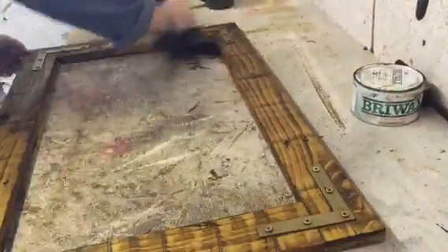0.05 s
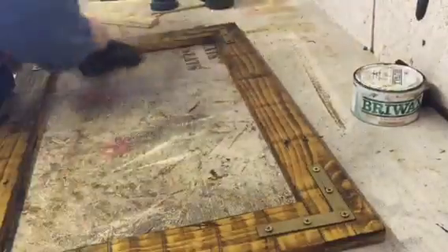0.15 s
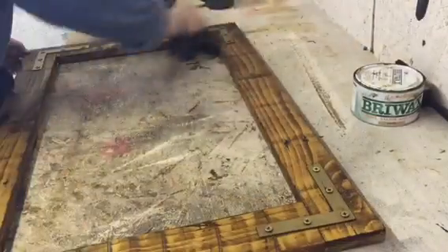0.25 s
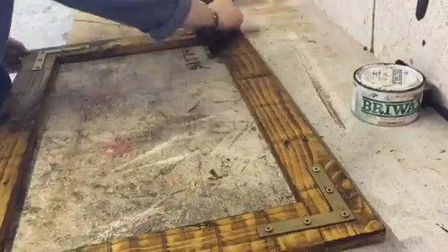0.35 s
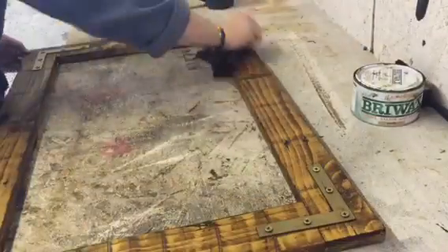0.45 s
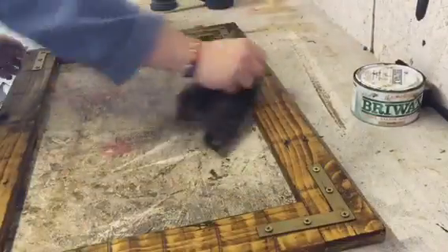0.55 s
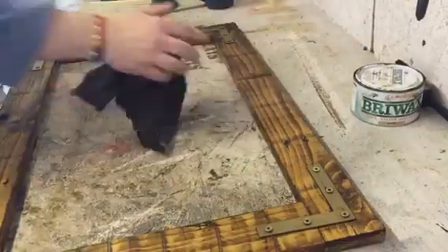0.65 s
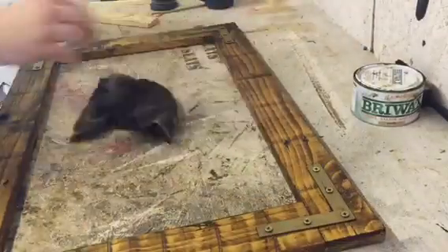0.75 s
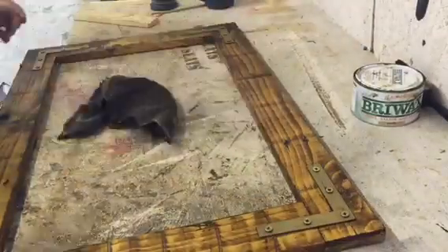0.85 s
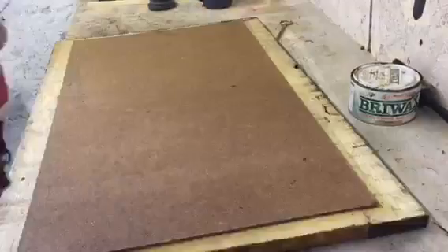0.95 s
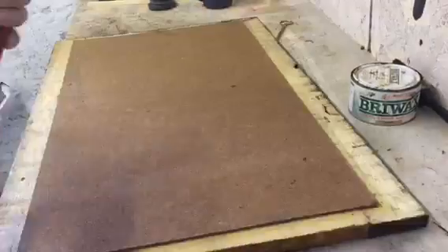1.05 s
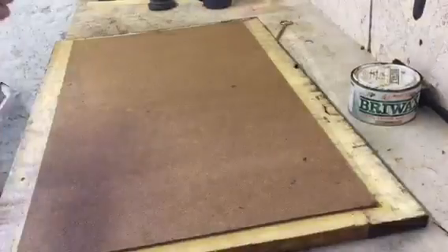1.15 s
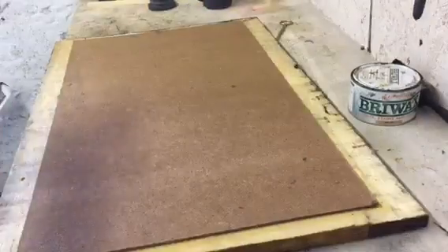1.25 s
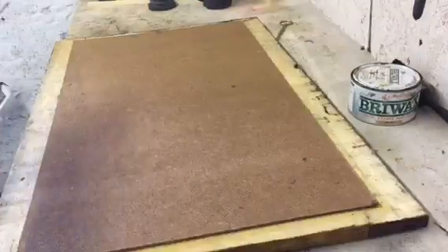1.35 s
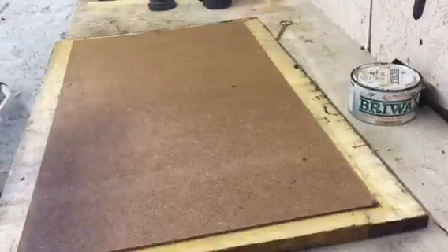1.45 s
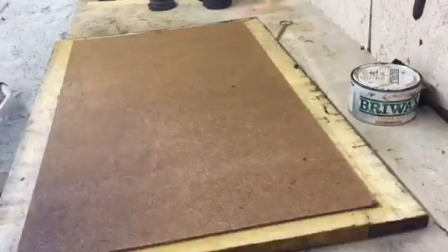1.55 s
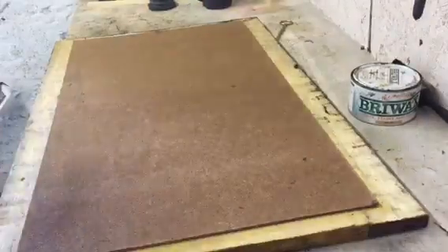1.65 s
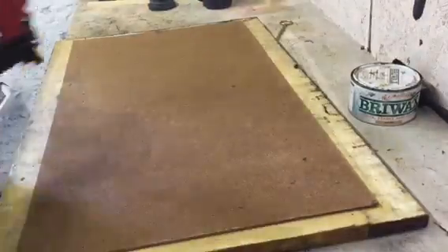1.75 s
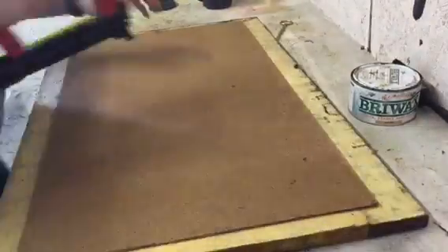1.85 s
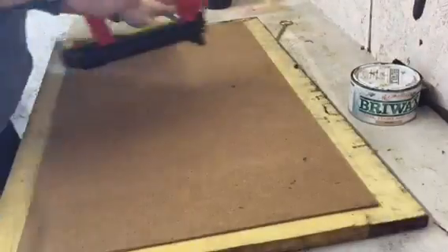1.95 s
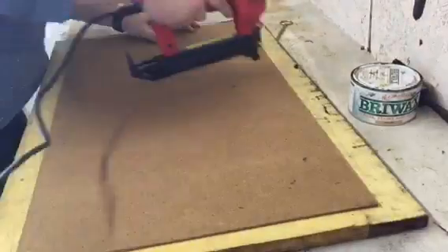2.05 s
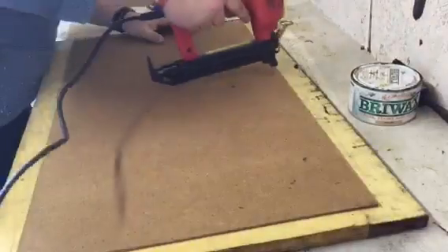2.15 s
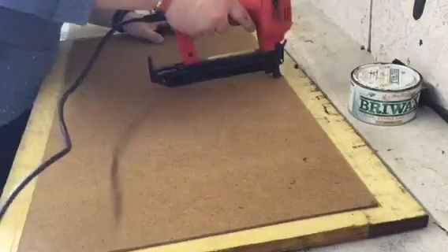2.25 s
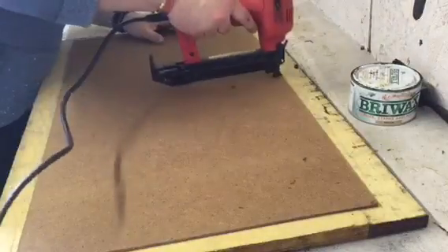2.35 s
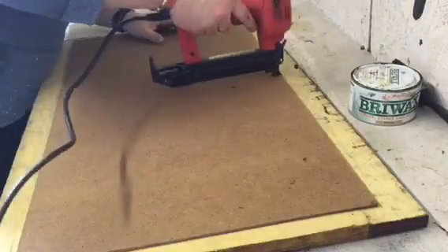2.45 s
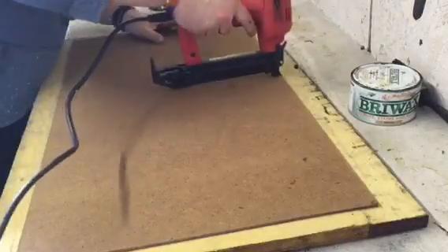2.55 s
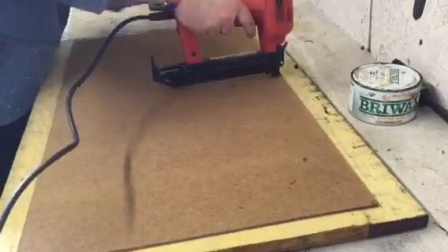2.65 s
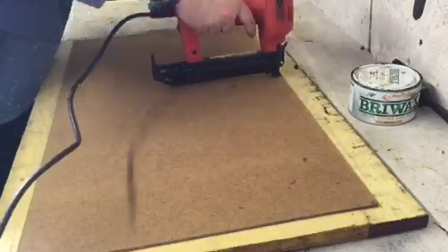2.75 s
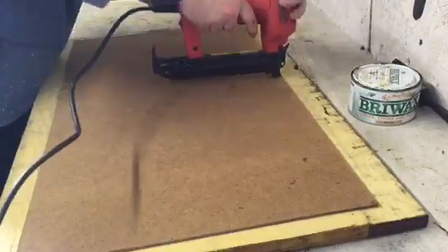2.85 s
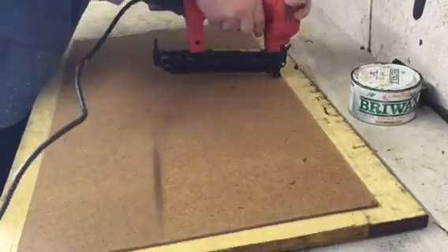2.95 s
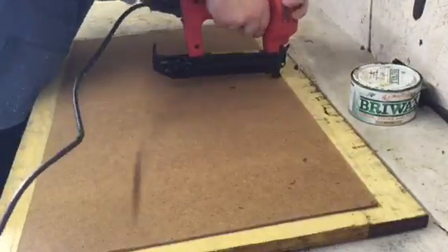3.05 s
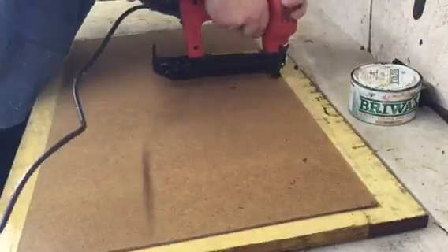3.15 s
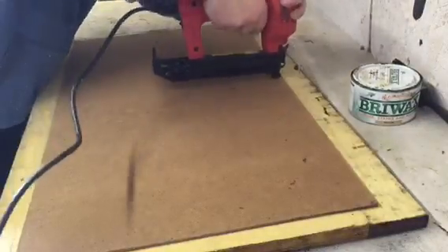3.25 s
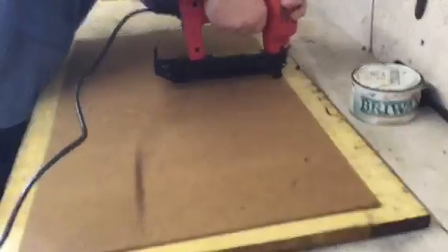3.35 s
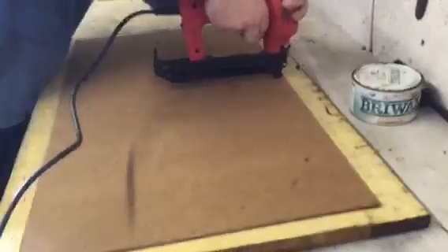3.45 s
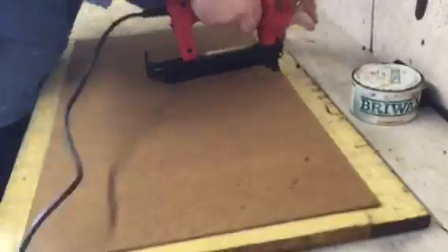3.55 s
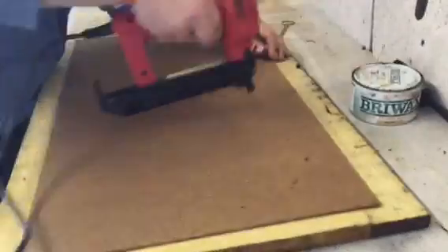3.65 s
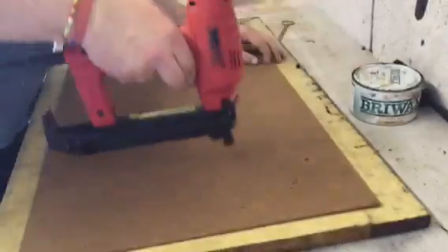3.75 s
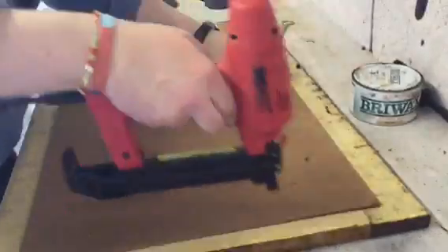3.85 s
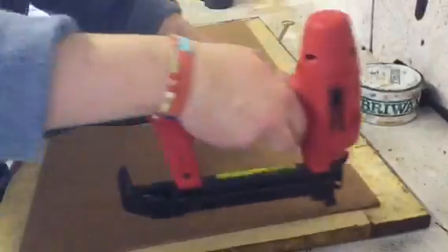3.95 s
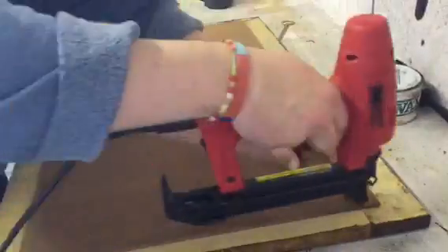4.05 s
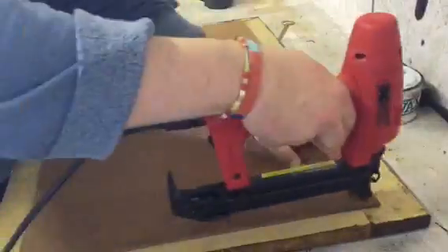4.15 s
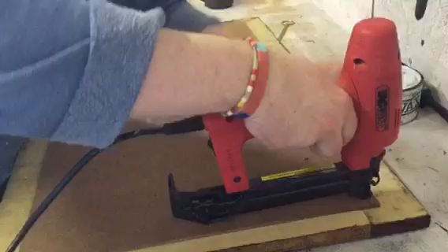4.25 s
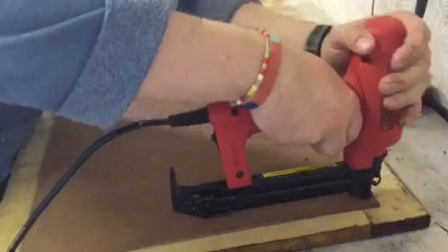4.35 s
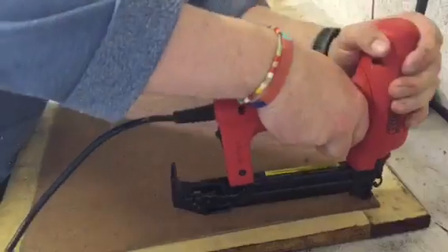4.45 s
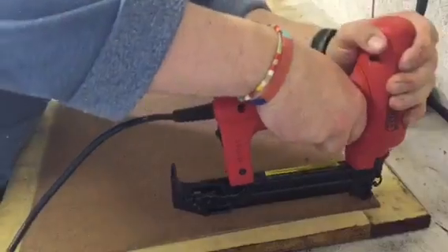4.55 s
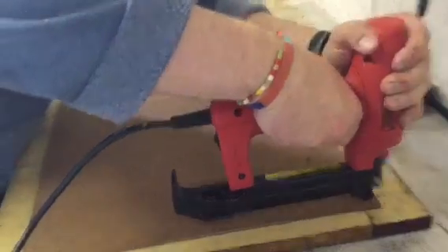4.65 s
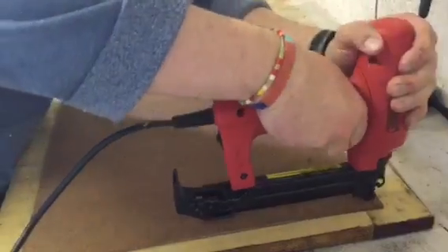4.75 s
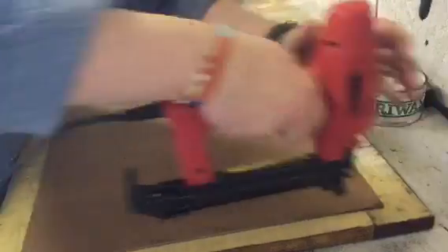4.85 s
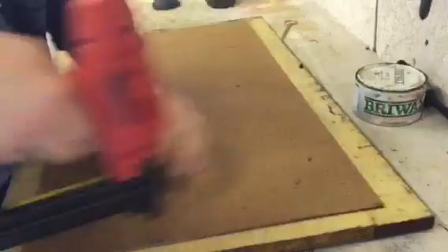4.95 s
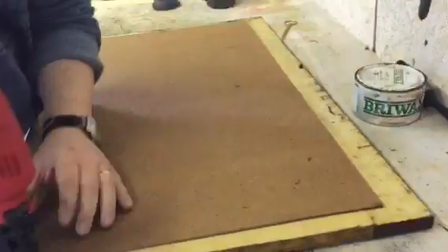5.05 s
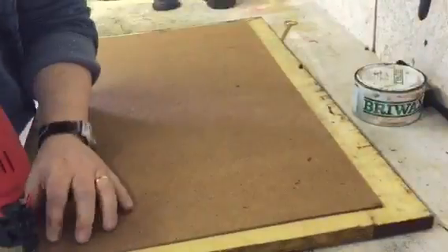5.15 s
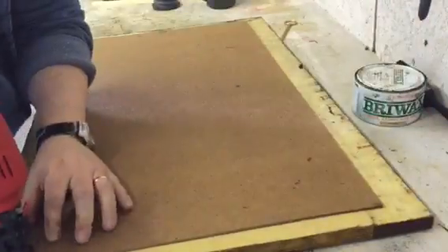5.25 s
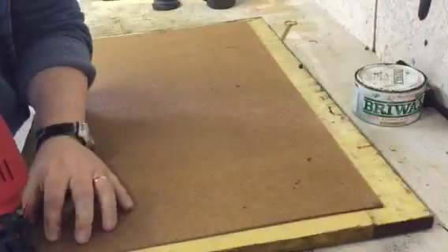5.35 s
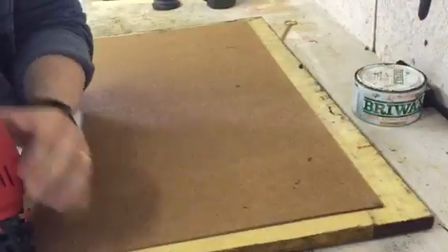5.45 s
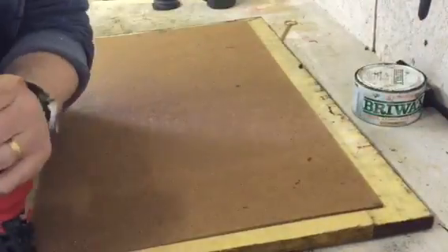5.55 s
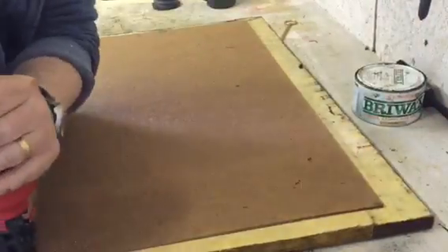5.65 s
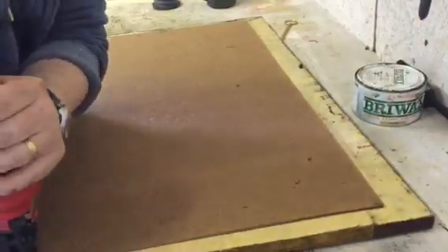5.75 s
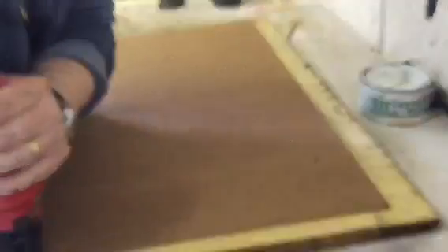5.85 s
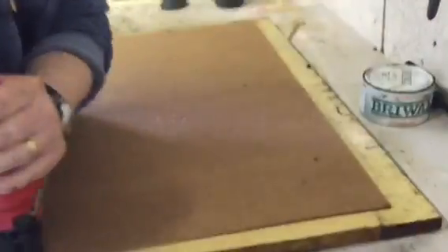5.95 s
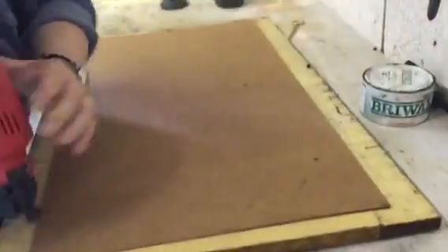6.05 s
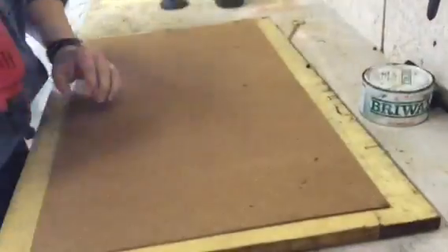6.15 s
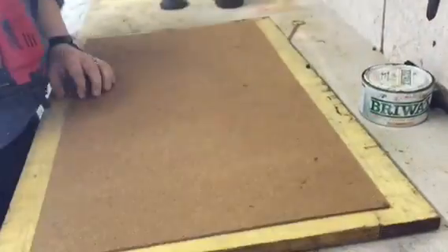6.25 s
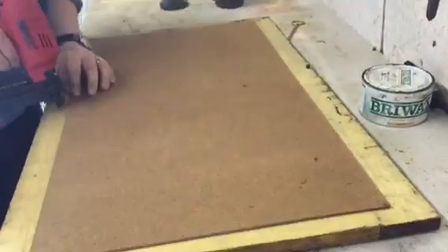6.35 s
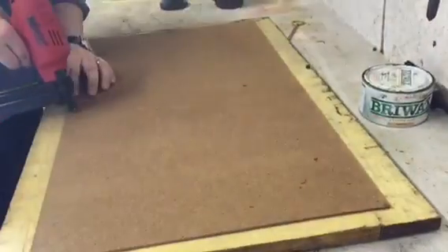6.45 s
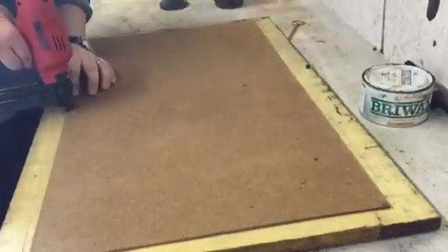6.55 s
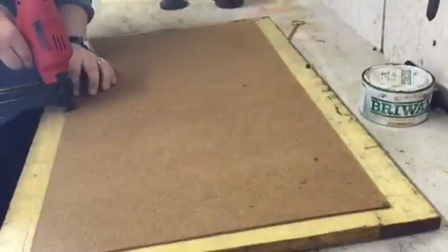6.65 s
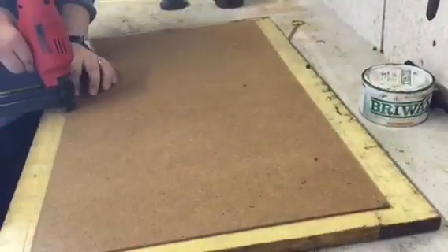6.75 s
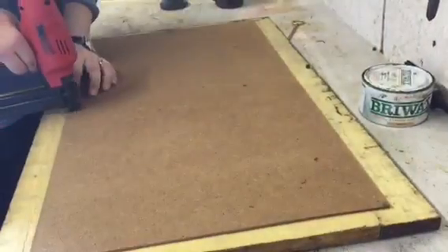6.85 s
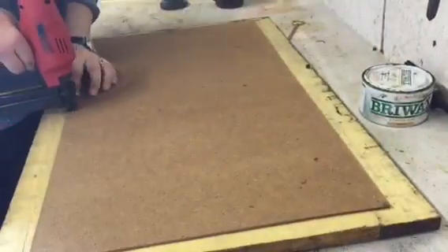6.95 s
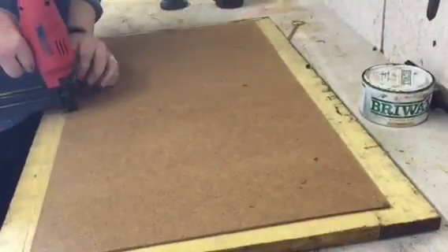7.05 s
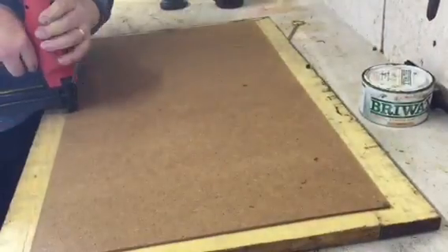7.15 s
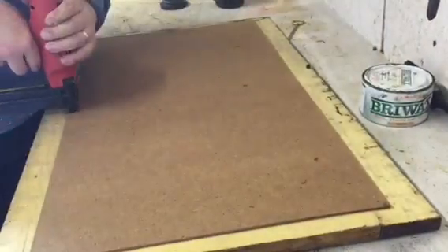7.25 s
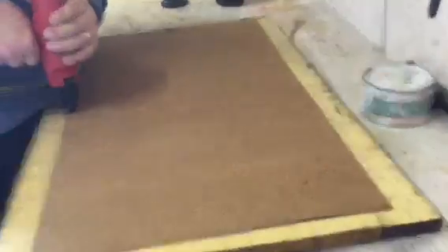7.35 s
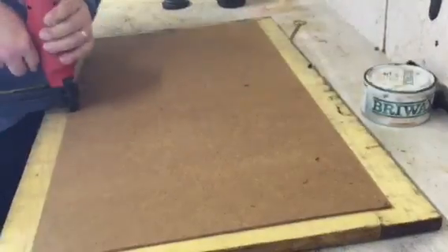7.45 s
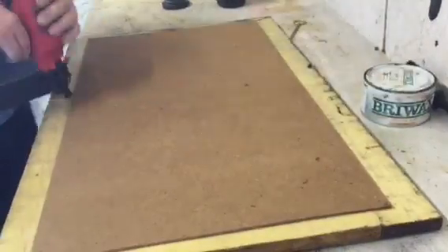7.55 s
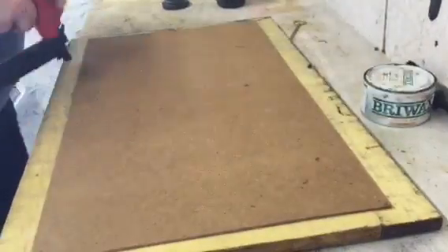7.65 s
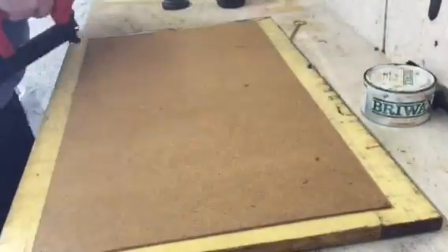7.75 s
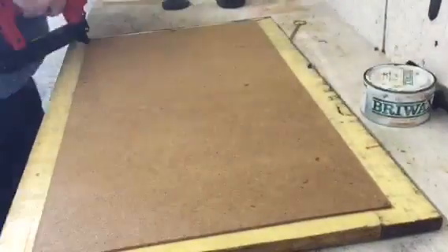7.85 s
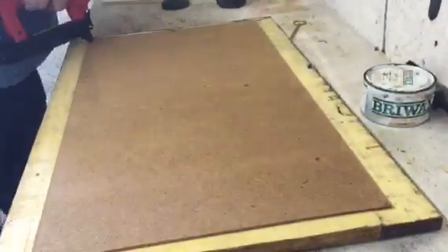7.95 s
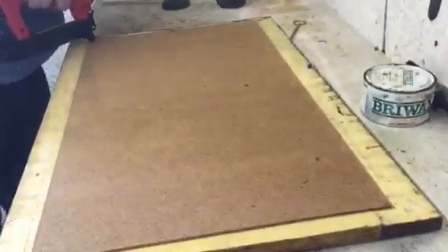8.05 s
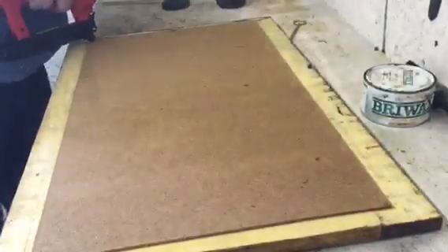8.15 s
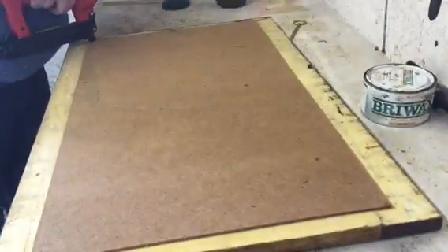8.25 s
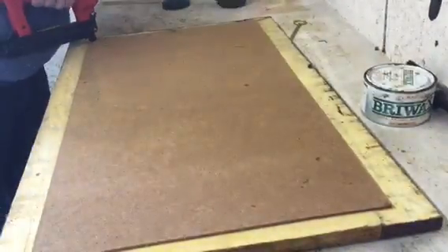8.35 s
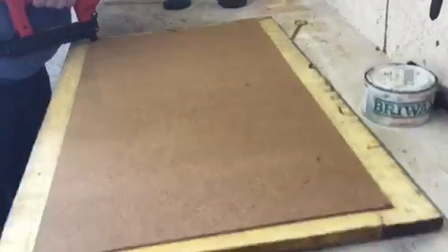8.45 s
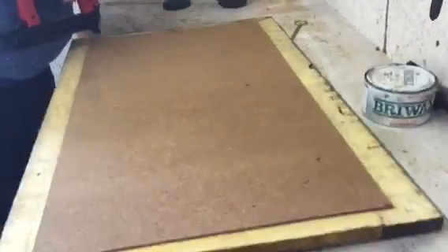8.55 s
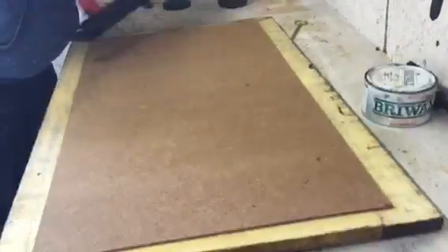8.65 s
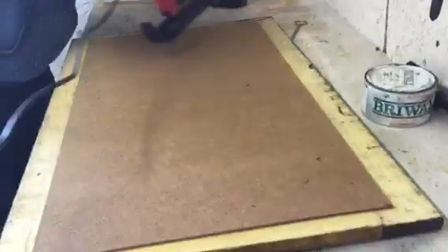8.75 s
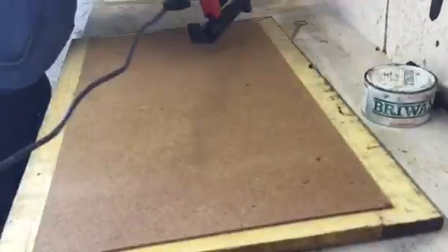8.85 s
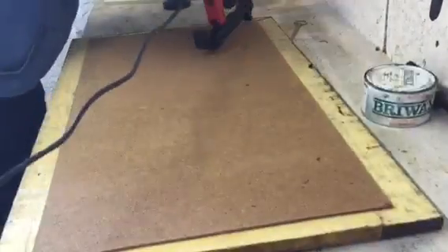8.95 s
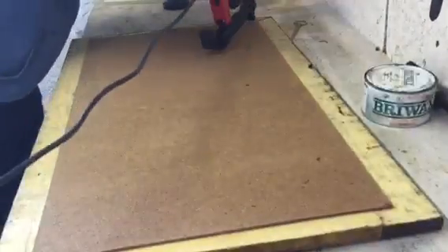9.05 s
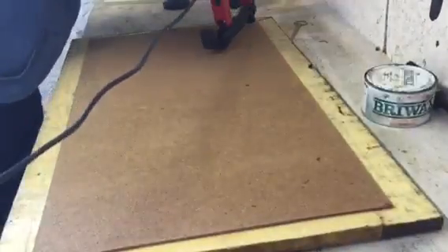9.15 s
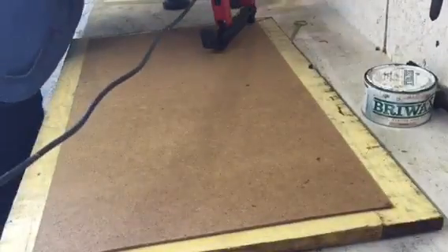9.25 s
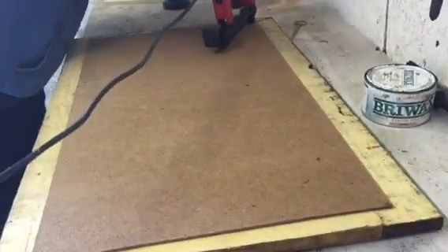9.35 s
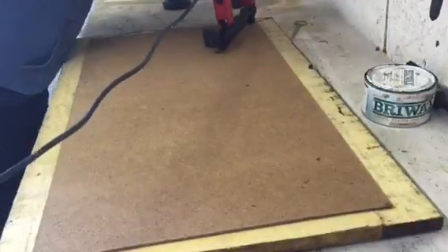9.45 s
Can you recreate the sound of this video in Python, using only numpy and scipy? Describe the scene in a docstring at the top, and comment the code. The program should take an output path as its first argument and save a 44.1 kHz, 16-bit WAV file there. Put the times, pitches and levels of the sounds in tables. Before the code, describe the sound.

A rag rubs briskly over wood, then an electric staple gun slams five loud, clipped shots into thin board amid knocks and clicks.

```python
"""An electric staple gun fires five times into a thin board over a wooden frame, overloading the microphone
of a phone beside the bench in a small workshop. Each shot is a noise crack, ringing board, steel and casing.
Before it a rag rubs wax into the frame: flickering grains of noise. The gun is set down and shifted about;
hands slide, the board rumbles (noise through its modes), plastic and metal parts tick and faintly squeak.
A decaying-noise room tail and a quiet shop hum surround it all."""
import sys
import numpy as np
from scipy import signal
from scipy.fft import rfft, irfft, next_fast_len
from scipy.io import wavfile
from scipy.ndimage import uniform_filter1d

SR = 44100
rng = np.random.default_rng(int(sys.argv[2]) if len(sys.argv) > 2 else 0)


def transcribe(signal):
    """Save signal, clipped to [-1, 1], as a 16-bit WAV file at the path in sys.argv[1]."""
    frames = np.atleast_2d(signal).T
    limited = np.clip(frames, -1, 1)
    pcm = np.round(limited * 32767).astype(np.int16)
    wavfile.write(sys.argv[1], SR, pcm)


def magnitude_from_level(level_db):
    """Linear magnitude for a level in decibels (20 dB per decade)."""
    exponent = np.asarray(level_db, float) / 20
    return 10 ** exponent


N = 418947
T = np.arange(N) / SR

# staple shots: t/s, crack level/dB, board boom f/Hz, boom level/dB, level of the board's middle modes/dB
SHOTS = [(3.3831, -0.5, 111.3, -1, 1), (4.7334, -2, 127.9, 2, 0), (5.9137, -1.5, 139.4, 3.5, 0),
         (7.4453, -0.5, 127.3, 2.5, -3.5), (8.4863, -1.5, 157.5, 1, -1.5)]
# soft knocks on the board: t/s, level/dB, level of the upper modes against it/dB
KNOCKS = [(0.019, -25.5, -8.5), (0.088, -31, 0.5), (0.21, -42, 6), (0.348, -19, -3), (0.371, -31, 8.5),
          (0.479, -25, -14), (0.534, -20, -10), (1.86, -45.5, 3), (2.089, -29, -9.5), (2.28, -33, -27),
          (2.401, -25.5, -8), (2.482, -31.5, -3), (2.527, -21, -7.5), (2.613, -28, -7), (2.719, -32, -16),
          (2.958, -29.5, -20), (3.022, -34, -42), (3.765, -24, -12.5), (3.852, -36, 3.5),
          (4.132, -35.5, 10), (4.175, -47, 14.5), (4.24, -40, 4), (4.308, -17, -13), (4.427, -25.5, -1.5),
          (5.204, -39, -12), (5.369, -32.5, -3), (5.462, -41, 6), (5.501, -8.5, -12.5), (5.649, -24, -15),
          (6.335, -46.5, 10.5), (6.45, -45, 6), (6.659, -24.5, -8), (6.779, -27, -4.5),
          (6.958, -28.5, -5.5), (7.106, -41.5, -0.5), (7.248, -20.5, -16), (7.849, -46.5, 3),
          (7.973, -44, 5.5), (8.145, -33.5, -1.5), (8.194, -23.5, -4.5), (8.256, -24, -18),
          (9.135, -27, 0.5), (9.222, -19, -6.5), (9.396, -36.5, -17)]
# modes of the thin board, before any extra damping: f/Hz, level/dB, t60/s
BOARD = [(131.3, -4.5, 0.1), (219.6, -5, 0.12), (300.5, -2, 0.13), (360.7, -3, 0.19), (402, -9.5, 0.078),
         (482, -10.5, 0.041), (672, -10.5, 0.051), (815, -13, 0.13), (1020, -15, .06), (1250, -14, .06)]


def on_log(table, hz):
    """Read a (Hz, value) table on a log-frequency axis."""
    f, v = np.transpose(table)
    return np.interp(np.log(np.maximum(hz, 1)), np.log(f), v)


def unit(x):
    """Scale to rms 1."""
    return x / np.sqrt(np.mean(x ** 2))


def peak(x):
    """Scale to peak 1."""
    return x / np.max(np.abs(x))


def colour(x, table):
    """Shape the spectrum of a long noise by (Hz, dB) points."""
    size = next_fast_len(len(x))
    hz = np.arange(size // 2 + 1) * SR / size
    return irfft(rfft(x, size) * magnitude_from_level(on_log(table, hz)), size)[:len(x)]


def band(x, lo_hz, hi_hz):
    """Causal band-pass."""
    edges_hz = [lo_hz, min(hi_hz, .45 * SR)]
    return signal.sosfilt(signal.butter(2, edges_hz, "band", fs=SR, output="sos"), x)


def fade(t, t60):
    """Exponential decay, 60 dB in t60."""
    return np.exp(-np.log(1000) * t / t60)


def ring(modes, t, phase=0):
    """Sum of decaying sine modes."""
    f, db, t60 = np.transpose(modes)[:, :, None]
    return np.sum(magnitude_from_level(db) * fade(t, t60) * np.sin(2 * np.pi * f * t + phase), axis=0)


def struck(modes, t, spread):
    """Every contact point shifts and weights the modes a little differently; spread is a fraction of f."""
    draw = rng.standard_normal((len(modes), 2))
    moved = [(f * (1 + spread * shift), db + 2.5 * weight, t60)
             for (f, db, t60), (shift, weight) in zip(modes, draw)]
    return ring(moved, t, rng.uniform(0, 2 * np.pi, (len(modes), 1)))


def dying(length_s, t60s, table):
    """Noise whose overlapping bands each die at their own speed."""
    t = T[:int(length_s * SR)]
    centres_hz = 60 * np.sqrt(2) ** np.arange(17)
    noise = rng.standard_normal((len(centres_hz), len(t)))
    total = np.zeros(len(t))
    for hz, n in zip(centres_hz, noise):
        decaying = n * fade(t, on_log(t60s, hz))
        total += magnitude_from_level(on_log(table, hz)) * band(decaying, hz / np.sqrt(2), hz * np.sqrt(2))
    return total


def walk(hold):
    """Random levels held for some samples and slewed."""
    steps = np.repeat(rng.standard_normal(N // hold + 1), hold)[:N]
    return uniform_filter1d(steps, size=hold)


def hump(start_s, held_s, rise_db_s, fall_db_s):
    """Gain that climbs steadily in dB, holds at 1 and falls away."""
    before_s = np.maximum(start_s - T, 0)
    after_s = np.maximum(T - start_s - held_s, 0)
    return magnitude_from_level(-rise_db_s * before_s - fall_db_s * after_s)


def add(out, s, x):
    """Mix x into out at time s."""
    i = int(s * SR)
    out[i:i + len(x)] += x[:N - i]


def shop_hum():
    """The shop's quiet hum: steady noise, strongest in the bass."""
    # spectrum of the shop: f/Hz, relative level per Hz/dB
    spectrum = [(18, -64), (30, -25), (95, -5), (169, 4), (326, -8), (981, -20.5), (1180, -22),
                (1450, -23.5), (1990, -21), (6480, -26.5), (15800, -30.5)]
    return magnitude_from_level(-61) * unit(colour(rng.standard_normal(N), spectrum))


def rumble():
    """Anything that moves shakes the board's low modes, damped by the hands lying on it."""
    # hands and gun resting and shifting on the board: t/s, shaking level/dB, upper modes against the lowest/dB
    handling = [(0, -59, 7.5), (0.65, -55, -8), (0.689, -84, -6), (1.04, -84, -12), (1.08, -67, 15),
                (1.35, -68.5, 11.5), (1.75, -64, -14), (2.75, -53, -14), (3.3, -66, -15), (4.3, -50, -7.5),
                (4.57, -66, -3), (5.45, -62.5, -6), (5.78, -64.5, -13.5), (6.499, -67, 9),
                (6.6, -74.5, 4.5), (6.999, -56, -5.5), (7.2, -68.5, 2), (9.05, -62, -8.5), (9.5, -54, -6)]
    s, db, upper_db = np.transpose(handling)
    power = magnitude_from_level(np.array([np.interp(T, s, db), np.interp(T, s, db + upper_db)])) ** 2  # rows: lowest, upper
    rise_db_s = 3000
    for s, db, upper_db in KNOCKS:
        gains = magnitude_from_level(db + np.array([[-17.5], [-16 + upper_db]]))
        power = power + (gains * hump(s, .037, rise_db_s, fall_db_s=300)) ** 2
    for s, *_ in SHOTS:
        gains = magnitude_from_level(np.array([[-44.5], [-48.5]]))
        power = power + (gains * hump(s, .1, rise_db_s, fall_db_s=127)) ** 2
    low, upper = np.sqrt(power)
    t = T[:9000]

    def shake(modes):
        """Continuous noise keeps the damped modes moving."""
        response = ring(modes, t) * fade(t, 0.18)
        return unit(signal.fftconvolve(rng.standard_normal(N), response)[:N])

    return low * shake(BOARD[:1]) + upper * shake(BOARD[1:6])


def knocks():
    """Fingers and the gun's foot bump the board: a slow push rings its low modes."""
    out, t = np.zeros(N), T[:int(.25 * SR)]
    for s, db, upper_db in KNOCKS:
        lowest = ring(BOARD[:1], t)
        upper = peak(struck(BOARD[1:8], t, 0.098))
        push = 1 - fade(t, .018)
        add(out, s, magnitude_from_level(db) * (lowest + magnitude_from_level(upper_db) * upper) * push)
    return out


def grit():
    """Friction: dense grains of uneven size, flickering in pressure."""
    noise = rng.standard_normal(N)
    size_db = 3.0 * np.minimum(rng.exponential(size=N), 6)
    pressure_db = 0.97 * walk(hold=300)
    return noise * magnitude_from_level(size_db + pressure_db)


def patchy(x, lo_hz, count):
    """The colour shifts along the grain: overlapping bands swell on their own."""
    centres_hz = lo_hz * 2 ** (np.arange(count) / 3)
    return sum(magnitude_from_level(.9 * walk(hold=1100)) * band(x, f, f * np.sqrt(2)) for f in centres_hz)


def strokes():
    """Each stroke drags grit over the grain: pressure builds, holds and lifts."""
    # rag, hands, sleeve and gun over wood: full pressure from t/s, held/s, scrape level/dB,
    # fine hiss against the scrape/dB, wooden body against the scrape/dB
    passes = [(0.028, 0.059, -35.5, -3.5, -10), (0.198, 0.0088, -41.5, -4.5, -19),
              (0.273, .12, -40, -5.5, -11.5), (0.472, .13, -42.5, -1.5, -22), (0.66, 0.11, -65.5, -9, -13),
              (1.08, .19, -67, -5.5, -13), (1.135, 0.016, -65, -13, -12), (1.3, 0.011, -43, -13.5, -12.5),
              (1.609, 0.0044, -49.5, -9.5, -24), (1.72, 0.018, -75, 10, -5), (1.814, 0.0053, -55, -5, -22),
              (1.9, 0.072, -61.5, -7, -5), (2.04, 0.11, -41, -10, -14), (2.169, 0.03, -50.5, -5.5, -3),
              (2.31, 0.25, -70.5, -1.4, 7.5), (2.618, 0.0083, -64, -4, 11.5), (2.712, 0.022, -61, -6.5, -8),
              (2.95, 0.061, -68.5, 5, -8), (3.068, 0.005, -60.5, 7.5, -16), (3.55, .11, -60, -6, -2),
              (3.725, 0.11, -53.5, -8, 2.5), (3.879, 0.01, -45.5, -22.5, 6),
              (3.97, 0.019, -46.5, -7.5, 2.5), (4.06, 0.016, -45.5, -5, -8.5),
              (4.13, 0.016, -48.5, -5.5, -2.5), (4.214, .015, -57.5, -2, -9.5), (4.312, .011, -55, -7, -6),
              (4.9, 0.021, -56, -3.5, -0.5), (5.0, .015, -58.5, -3, -1), (5.05, .2, -74, -2, -3.5),
              (5.51, 0.011, -46.5, -7, -1.5), (5.643, 0.0042, -45, -3, -4), (6.1, 0.019, -57, -8, -1.5),
              (6.19, 0.15, -63, -4.5, 0), (6.33, 0.066, -56.5, -7, -4), (6.458, 0.058, -37, -9.5, -10.5),
              (6.68, 0.028, -62, -11.5, -1), (6.784, 0.0072, -55.5, -17, -0.5),
              (6.82, 0.22, -64, -10.5, -6), (7.116, 0.047, -60.5, -7.5, 8.5),
              (7.6, 0.025, -55.5, -5.5, -2.5), (7.67, .2, -68, -0.2, -9.5), (7.976, 0.12, -47, -6, -4),
              (8.12, 0.059, -52.5, -9, -7.5), (8.25, 0.048, -55.5, -7.5, -4), (8.62, 0.022, -55, -8, 1),
              (8.68, 0.12, -65, -12.5, -9.5), (8.85, .011, -54, -5, -8), (9.13, 0.083, -72, -6, 6),
              (9.235, 0.0059, -53, -14.5, 9.5), (9.24, .1, -62, -12, -2.9)]
    # colour of the scrape: f/Hz, relative level per Hz/dB
    scrape = [(820, -40.5), (1400, -10), (2010, 0.5), (2200, -0.5), (4140, 1), (5880, -5.5), (7000, -7.5),
              (9100, -25.5), (15400, -120)]
    grains = patchy(grit(), 400, count=16)
    rough = unit(colour(grains, [(900, -40.5)] + scrape[:-1] + [(9000, -35)]))
    hiss = unit(band(grains, 6000, 14000))
    body = unit(band(grains, 600, 1500))
    power = np.zeros((3, N))
    for s, held_s, db, hiss_db, body_db in passes:
        gains = magnitude_from_level(db + np.array([[0], [hiss_db], [body_db]]))
        power += (gains * hump(s, held_s, rise_db_s=554, fall_db_s=378.5)) ** 2
    return np.sum(np.sqrt(power) * np.array([rough, hiss, body]), axis=0)


def level_dip():
    """Gain of the whole scene: the level dips briefly, once."""
    return 1 - .93 * hump(1.032, .014, rise_db_s=900, fall_db_s=2700)


def squeaks():
    """Faint narrow squeaks of rubbing parts that catch and slip."""
    # thin squeaks: start t/s, end t/s, centre f/Hz, width/Hz, level before swell and slips/dB
    rubs = [(1.177, 1.552, 4150, 247, -63), (2.246, 2.59, 12800, 900, -59), (2.442, 2.565, 6600, 500, -65),
            (2.626, 2.744, 6600, 500, -64.5), (2.356, 2.77, 2200, 400, -69),
            (3.59, 3.738, 1750, 148, -58.5), (5.049, 5.297, 4570, 200, -70.5),
            (6.103, 6.396, 4470, 199, -70), (6.661, 6.973, 2300, 200, -69), (8.125, 8.38, 3590, 504, -58),
            (8.142, 8.404, 2700, 150, -62.5), (8.651, 8.881, 2800, 248, -60), (9.1, 9.38, 3400, 250, -63.5),
            (9.28, 9.374, 3980, 900, -59.5)]
    out = np.zeros(N)
    for t0, t1, hz, width, db in rubs:
        swell = np.hanning(int((t1 - t0) * SR)) ** .5
        held = np.repeat(rng.standard_normal(40), 900)[:len(swell)]
        slips = uniform_filter1d(held, size=600)
        tone = unit(band(rng.standard_normal(len(swell)), hz - width / 2, hz + width / 2))
        add(out, t0, magnitude_from_level(db + 3.2 * slips) * swell * tone)
    return out


def casing(t):
    """Short plastic ring of the gun body."""
    # gun body modes: f/Hz, level/dB
    body_modes = [(1600, -3), (1733, -1), (2215, 1), (2450, -0.5), (3180, -3), (3460, -4), (3910, -6.5),
                  (4300, -1.5), (4713, 6.5), (5300, -2)]
    t60_s = .04
    return struck([(f, db, t60_s) for f, db in body_modes], t, 0.024)


def ticks():
    """A snap with a short rattle through the casing; dull ones are softer contacts that rise slower."""
    # trigger, latch, cable and casing: t/s, level/dB, centre f/Hz, rattle t60/s, 7.4-12 kHz sparkle/dB
    contacts = [(1.601, -49, 700, 0.14, -3), (1.862, -31.5, 945, 0.22, -25), (2.316, -54, 1250, .15, -25),
                (2.399, -44, 1250, 0.34, -14), (2.482, -42, 1250, 0.1, -16), (2.525, -48, 1250, 0.081, -25),
                (2.548, -41, 1250, .1, -20), (2.612, -51, 1250, .12, -25), (2.621, -44, 4000, 0.05, -9),
                (2.878, -15.5, 5540, 0.096, 5), (3.350, -35.5, 2500, .05, 6.5),
                (3.361, -22.5, 1730, 0.065, -12), (3.559, -39.5, 2650, 0.088, -22.5),
                (3.586, -47.5, 5990, .04, -3), (3.619, -38.5, 1250, 0.039, -1),
                (3.723, -34, 1054, 0.32, -20), (3.736, -41.5, 4000, .05, -10),
                (3.803, -41.5, 2600, .05, -12), (3.858, -20.5, 2110, 0.17, -34),
                (3.882, -42.5, 7000, .05, -8), (4.0, -46.5, 7010, .05, 2), (4.128, -36, 724, 0.084, -18),
                (4.153, -46, 5000, 0.038, 4), (4.21, -37.5, 2960, 0.076, -4),
                (4.296, -38.5, 1460, 0.18, -16.5), (4.315, -41, 2604, .07, -12),
                (4.427, -17, 5350, 0.099, -18.5), (4.441, -20.5, 3180, 0.13, -6.5),
                (4.697, -34, 2520, .05, 2), (4.708, -22.5, 1990, 0.1, -11), (4.918, -46, 6020, 0.051, 6),
                (5.363, -31.5, 1360, 0.16, -33.5), (5.465, -42, 2230, 0.094, -15),
                (5.514, -25, 2440, 0.14, -24), (5.523, -34, 2500, .08, -14),
                (5.614, -19.5, 5300, 0.071, -13), (5.623, -27, 5970, .08, 0.1), (5.884, -31.5, 900, .08, 9),
                (5.895, -30.5, 1200, .05, -7), (6.109, -44, 790, 0.15, -4.5),
                (6.651, -31, 2950, 0.11, -9.5), (6.778, -36.5, 923, 0.084, -27),
                (6.956, -40, 1292, 0.11, -8), (7.111, -36, 1201, 0.089, -18), (7.155, -44, 1200, .07, -25),
                (7.242, -14, 4880, 0.11, 5.5), (7.417, -34.5, 2500, 0.2, 0), (7.618, -41.5, 843, 0.057, -1),
                (7.971, -39, 2590, 0.09, -6), (8.14, -42.5, 2000, .06, -15), (8.186, -39, 2500, 0.057, -9),
                (8.454, -36, 1830, 0.051, 1), (8.468, -31.5, 1510, 0.047, -9.5),
                (8.637, -50, 6000, 0.043, 3), (8.83, -45, 3020, 0.095, -9), (9.13, -35.5, 740, 0.11, -34),
                (9.211, -27.5, 851, 0.074, -28.5), (9.212, -32, 4450, .08, -21),
                (9.263, -34.5, 4500, 0.069, -9.5), (9.392, -51.5, 3000, 0.054, -8)]
    out, t = np.zeros(N), T[:int(.25 * SR)]
    for s, db, hz, t60, air_db in contacts:
        snap_and_rattle = fade(t, 0.0092) + magnitude_from_level(-9.0) * fade(t, np.clip(t60, .01, .4))
        rise = 1 - np.exp(-t * hz / 0.28)
        burst = rng.standard_normal(len(t)) * snap_and_rattle * rise
        ringing = signal.fftconvolve(burst, casing(t[:2000]))[:len(t)]
        body = peak(burst) + magnitude_from_level(-16) * peak(ringing)
        body = band(band(body, hz * .5, hz * 1.9), hz * 0.31, hz * 2.8)
        sparkle = peak(band(burst, 7400, 12000))
        add(out, s, magnitude_from_level(db) * (peak(body) + magnitude_from_level(air_db) * sparkle))
    return out


def plunger(lead_s):
    """Click of the released plunger, then its rattle swells up to the blow."""
    t = T[:int(lead_s * SR)]
    click = band(rng.standard_normal(len(t)), 2500, 15000) * fade(t, 0.02)
    rush = band(rng.standard_normal(len(t)), 220, 3900) * fade(t[::-1], 0.023)
    return magnitude_from_level(-25) * click + magnitude_from_level(-6) * rush


def crack():
    """The driver slams the staple home: a noise burst whose treble dies first, scaled to its onset."""
    # spectrum before the tilt: f/Hz, relative level per Hz/dB
    spectrum = [(290, -24.5), (500, 9), (958, -6), (1630, 0), (2910, -1), (3520, -2), (4180, 0), (4830, -5),
                (6180, -9.5), (11500, -9), (15800, -18)]
    # decay of the crack: f/Hz, t60/s
    decay = [(500, .14), (2000, .12), (5000, 0.089), (15000, 0.064)]
    tilt_db_per_octave = 1.72
    points = [(80, -29.5), (200, 4.5)] + spectrum
    tilted = [(f, db + tilt_db_per_octave * np.log2(f / 2000)) for f, db in points]
    burst = dying(.4, decay, tilted)
    return burst / np.std(burst[:300])


def shots():
    """The plunger starts, the staple strikes: crack, boom of the board, thin steel ring, bench and casing."""
    # magazine and spring: f/Hz, level/dB, t60/s
    steel = [(2300, -52, .4), (4450, -55, .4), (5496, -57, .8), (10590, -59, .45), (11360, -56, .5),
             (13360, -56, .35)]
    # the bench hums on after a shot: f/Hz, level/dB, t60/s
    bench = [(150, -33.5, 0.52), (194, -35.5, .6), (274, -41, 0.91), (450, -44.5, .8)]
    out, t = np.zeros(N), T[:int(.8 * SR)]
    push = np.hanning(int(0.0014 * SR))
    pressed_t60_s = 0.24  # extra damping while the gun is pressed on the board
    lead_s, boom_lag_s = .011, .006
    for s, db, boom_hz, boom_db, mid_db in SHOTS:
        add(out, s - lead_s, plunger(lead_s))
        add(out, s, magnitude_from_level(db) * crack())
        # the board is pressed differently each time; its lowest mode swings up late
        boom = ring([(boom_hz, boom_db, BOARD[0][2])], t)
        add(out, s + boom_lag_s, boom * (1 - fade(t, 0.016)) * fade(t, 2 * pressed_t60_s))
        mids = struck(BOARD[1:], t, 0.054) * (1 - fade(t, 0.0079)) * fade(t, pressed_t60_s)
        add(out, s, magnitude_from_level(mid_db) * np.convolve(mids, push / push.sum()))
        add(out, s, struck(steel, t, 0.0036))
        add(out, s, struck(bench, t, .02) * (1 - fade(t, .05)))
        add(out, s, magnitude_from_level(-15) * casing(t))
    return out


def room_tail(dry):
    """Reflections of the small room: decaying noise, shorter in the treble."""
    # decay of the room: f/Hz, t60/s
    decay = [(100, 0.46), (1000, 0.35), (4000, 0.26), (15000, 0.12)]
    room = dying(.6, decay, [(100, 0), (15000, 0.5)])
    return magnitude_from_level(-22.5) * signal.fftconvolve(dry, room / np.linalg.norm(room))[:N]


def scene():
    """All sources at the bench, the small room's tail and the shop's quiet hum."""
    dry = rumble() + knocks() + strokes() + squeaks() + ticks() + shots()
    return ((dry + room_tail(dry) + shop_hum()) * level_dip())[None]


def top_cut(x):
    """Nothing passes above the cut-off."""
    return signal.sosfilt(signal.butter(12, 16270, fs=SR, output="sos"), x)


def record(dry):
    """The phone cuts the deep bass and the top, and its converter clips flat on the shots."""
    cut = signal.sosfilt(signal.butter(4, 75, "high", fs=SR, output="sos"), dry)
    cut = signal.sosfilt(signal.butter(4, 15500, fs=SR, output="sos"), cut)
    clipped = np.clip(cut, -.97, .97)
    return top_cut(clipped)


dry = scene()
out = record(dry)
transcribe(out)
```